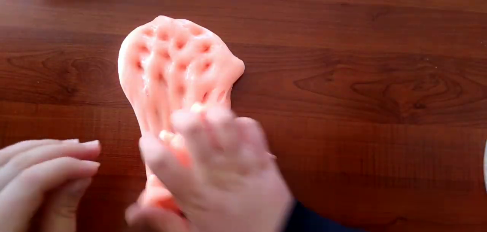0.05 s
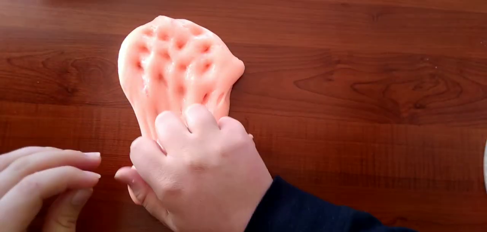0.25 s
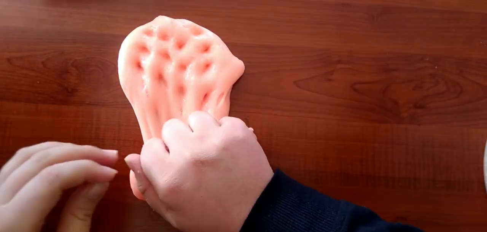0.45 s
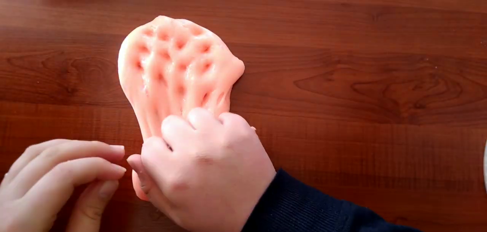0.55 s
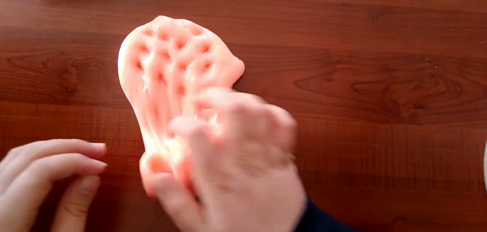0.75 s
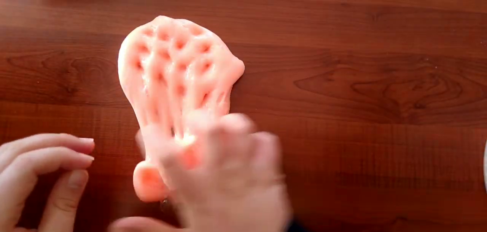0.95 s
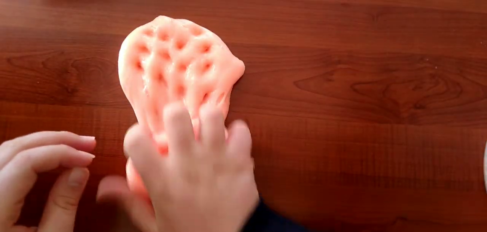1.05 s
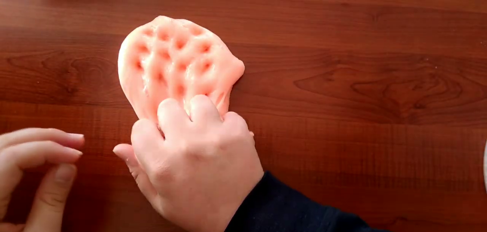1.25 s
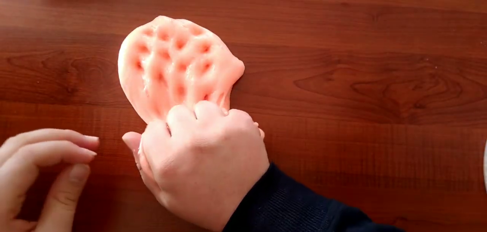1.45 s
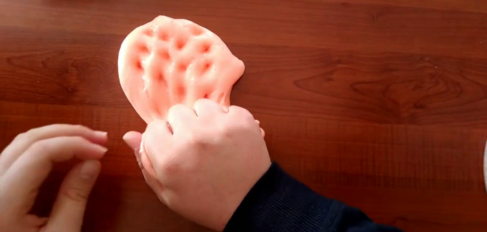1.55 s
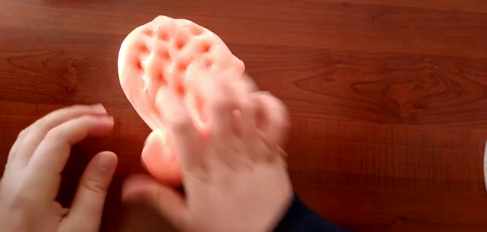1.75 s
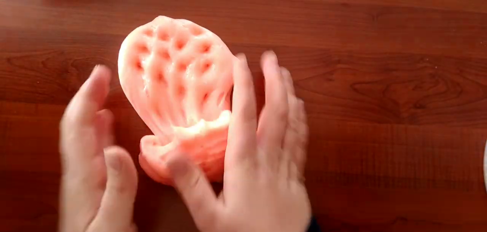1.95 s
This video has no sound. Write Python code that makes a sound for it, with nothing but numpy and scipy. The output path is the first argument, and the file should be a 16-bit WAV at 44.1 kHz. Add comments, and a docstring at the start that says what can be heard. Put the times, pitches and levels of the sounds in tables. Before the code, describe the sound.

Close slime pops and brief wet squelches, with soft hand thuds in a quiet small room

```python
"""A small room, a wooden table, a stereo microphone close by: a hand kneads slime over dull, quiet room noise.
First the hand bumps the table, a squeeze squelches as a swarm of minute bubbles, and tiny bubbles tick.
Then trapped air pockets burst as sharp pulses, and the slime hollow under the hand rings after each.
Small blasts overload the left channel, which swings back slowly through zero.
Throughout, a gate turns the treble down wherever it is faint."""
import sys
import numpy as np
from scipy import signal
from scipy.fft import rfft, irfft
from scipy.io import wavfile
from scipy.ndimage import uniform_filter1d

SR = 44100
rng = np.random.default_rng(int(sys.argv[2]) if len(sys.argv) > 2 else 0)


def generate_wav(signal):
    """Clip the signal to [-1, 1] and save it as 16-bit WAV at the path in sys.argv[1]."""
    frames = np.transpose(np.atleast_2d(signal))
    scaled = np.clip(frames, -1, 1) * 32767
    pcm = np.round(scaled).astype(np.int16)
    wavfile.write(sys.argv[1], SR, pcm)


N = 88200
SIZE = 2 ** 17  # transform length in samples, with space for the tails
HZ = np.fft.rfftfreq(SIZE, 1 / SR)
T = np.arange(N) / SR


def amp(db):
    """Decibels to gain."""
    return 10 ** (np.asarray(db) / 20)


def unit(x):
    """Scaled to rms 1."""
    return x / np.sqrt(np.mean(x ** 2))


def along(points, hz=HZ):
    """Read a curve of (frequency, value) points on a log frequency axis."""
    point_hz, value = np.transpose(points)
    return np.interp(np.log(hz + 1), np.log(point_hz), value)


def filtered(x, response):
    """Sound x passed through a frequency response."""
    return irfft(rfft(x, SIZE) * response, SIZE)[..., :N]


def causal(db):
    """Minimum-phase response: the most compact causal one with this colour in dB."""
    cepstrum = irfft(np.log(amp(db)))
    cepstrum[1:SIZE // 2] *= 2
    cepstrum[SIZE // 2 + 1:] = 0
    return np.exp(rfft(cepstrum))


def resonance(hz, q):
    """One damped mode of peak gain 1."""
    damping = 1j * HZ * hz / q
    return damping / (hz ** 2 - HZ ** 2 + damping)


def pulse(s):
    """Spectrum of a pressure pulse at time s."""
    return np.exp(-2j * np.pi * HZ * s)


def noise(alike, db=0):
    """Coloured stereo noise of rms 1; the mid/side balance sets how alike left and right are."""
    turn = np.arccos(np.clip(along(alike), -1, 1)) / 2
    balance = np.array([np.cos(turn), np.sin(turn)])
    mid, side = filtered(rng.standard_normal((2, N)), amp(db) * balance)
    return unit(np.array([mid + side, mid - side]))


# colour of the room noise: hz, relative_level_db
BACKGROUND_COLOUR = [(20, 5), (50, 4), (100, -8.5), (180, -8), (300, -17), (500, -17.5), (1000, -22.5),
                     (2400, -25.5), (2800, -35.5), (3300, -35.5), (6000, -34.5), (15000, -41.5)]
# its rms level over time: time_s, level_db (re full scale)
BACKGROUND_LEVEL = [(0, -59), (.05, -75), (.13, -57.5), (.8, -53.5), (1.1, -57), (1.5, -57), (1.6, -59.5),
                    (1.75, -52), (2, -56.5)]
# how alike it is at the two microphone channels: hz, left_right_likeness
BACKGROUND_ALIKE = [(30, 1), (300, 0.87), (1500, .6), (4000, .2), (12000, .1)]


def room_noise():
    """Dull background noise of the room, its level dipping sharply near the start, then wandering."""
    level_db = np.interp(T, *np.transpose(BACKGROUND_LEVEL))
    return amp(level_db) * noise(BACKGROUND_ALIKE, along(BACKGROUND_COLOUR))


# colour of the direct sound: hz, level_db
DIRECT_COLOUR = [(1500, 0.5), (2500, -3), (5000, 3), (10000, -12)]
# colour of the scatter from hand and table: hz, level_db
SCATTER_COLOUR = [(200, -17), (600, -1.5), (1200, -5.5), (2500, -7.5), (8000, 2)]
# its stereo likeness, held within -1 to 1: hz, left_right_likeness
SCATTER_LIKENESS = [(200, -2.4), (1000, -0.72), (2200, -1), (4000, 0.61)]
SCATTER_DELAY_S, SCATTER_T60_S = 0.0004, 0.023
RIGHT_LAG_S = 0.00005  # the direct sound reaches the left channel first


def near_sound():
    """Direct sound, and the brief decaying scatter from hand and table close to the microphone."""
    arrivals = np.array([pulse(0), pulse(RIGHT_LAG_S)])
    direct = filtered(T == 0, causal(along(DIRECT_COLOUR)) * arrivals)
    scatter = noise(SCATTER_LIKENESS) * amp(-60 * T / SCATTER_T60_S) * (T > SCATTER_DELAY_S)
    return direct + filtered(unit(scatter) / np.sqrt(N), causal(along(SCATTER_COLOUR)))


# time for the room to fall by 60 dB: hz, decay_s
ROOM_DECAY = [(100, .45), (400, 0.33), (2000, 0.36), (5000, 0.35), (12000, 0.24)]
# colour of the room's tail: hz, level_db
ROOM_COLOUR = [(80, -12.5), (300, -9.5), (1000, -8.5), (2200, -11), (4200, 2.5), (8000, -3.5),
               (13000, -1.5)]
# its stereo likeness: hz, left_right_likeness
ROOM_LIKENESS = [(100, .9), (400, 0.86), (1200, 0.064), (4000, 0)]
ROOM_BUILD_S = 0.015


def room_tail():
    """Reverberation as noise that builds up, then decays at its own rate in each band."""
    hz, t, bands = signal.stft(noise(ROOM_LIKENESS), SR, nperseg=256)
    decay = amp(-60 * t / along(ROOM_DECAY, hz)[:, None])
    tail = signal.istft(bands * decay, SR, nperseg=256)[1][:, :N]
    tail = unit(tail * (1 - np.exp(-T / ROOM_BUILD_S))) / np.sqrt(N)
    return filtered(tail, amp(along(ROOM_COLOUR)))


# echoes off a near surface and a wall: delay_s, level_db
REFLECTIONS = [(.0023, -15.5), (.0098, -17.5)]


def paths():
    """From one spot on the table to the microphone: near sound, its echoes and the room's tail."""
    echoes = sum(amp(db) * pulse(s) for s, db in REFLECTIONS)
    return filtered(near_sound(), 1 + echoes) + room_tail()


def heard(spectrum):
    """A sound on the table as it reaches the microphone, with freshly drawn scatter and tail."""
    return filtered(paths(), spectrum)


# soft bumps of the hand on the table: start_s, relative_level_db, pitch_hz, dull_above_hz
HAND_BUMPS = [(0.0614, 1, 220, 1300), (.897, -9, 194.4, 300), (1.042, 5, 81, 191), (1.105, -3.5, 123, 218)]
BUMP_Q, SLAP_DB = 1.3, -14


def bumps():
    """The hand meets the table through the slime: the softer the contact, the duller the thud."""
    spectrum = 0
    for start, db, hz, dull_hz in HAND_BUMPS:
        contact = causal(db - 10 * np.log10(1 + (HZ / dull_hz) ** 8))
        thud = resonance(hz, BUMP_Q)
        slap = amp(SLAP_DB) * resonance(4 * hz, 1)
        spectrum = spectrum + pulse(start) * contact * (thud + slap)
    return heard(spectrum)


# squeezes of the slime: start_s, end_s, level_db (rms re full scale while held), dull_above_hz
SLIME_SQUEEZES = [(0.083, 0.12, -57, 1000), (0.664, 0.734, -51.5, 13200), (1.699, 1.748, -48, 6020),
                  (1.765, 1.79, -55.5, 10000)]
# colour of the squelch: hz, relative_level_db
SQUELCH_COLOUR = [(80, -11.5), (230, -6), (400, 4), (700, -4.5), (1300, -3), (2300, -1), (3300, -15),
                  (5000, -19.5), (7500, -11.5), (11000, -31.5), (16000, -42)]
SQUEEZE_RISE_S, SQUEEZE_FALL_S = 0.02007, 0.012
BUBBLES_PER_S, BUBBLE_SPREAD_DB = 550, 4.5
HISS_DB = -4.5  # relative to the swarm


def squelch():
    """Each squeeze crushes a swarm of minute bubbles over a wet hiss; it swells, holds and stops."""
    out = np.zeros((2, N))
    for start, end, db, dull_hz in SLIME_SQUEEZES:
        rise = np.minimum(T - start, 0) / SQUEEZE_RISE_S
        fall = np.maximum(T - end, 0) / SQUEEZE_FALL_S
        swell = amp(db) * np.exp(rise - fall)
        bursts = rng.random(N) < BUBBLES_PER_S / SR
        swarm = bursts * amp(BUBBLE_SPREAD_DB * rng.standard_normal(N))
        swarm_heard = unit(heard(rfft(swarm - swarm.mean(), SIZE)))
        wet = swarm_heard + amp(HISS_DB) * noise(ROOM_LIKENESS)
        colour = amp(along(SQUELCH_COLOUR)) / np.sqrt(1 + (HZ / dull_hz) ** 4)
        out += swell * unit(filtered(wet, colour))
    return out


# tiny bubbles: start_s, relative_level_db, pitch_hz, crack_db (relative to the ring)
TINY_BUBBLES = [(0.1174, -14, 1920, -28.5), (.1344, -19.5, 2000, -17), (.2851, 3, 740, -29),
                (0.331, -20.5, 6460, -30.5), (0.4719, 0.5, 1820, -14), (.8662, -16.5, 900, -42),
                (1.1732, -21, 1683, -24.5), (1.1854, -17, 2250, -36), (1.218, -34.5, 1900, -2.5),
                (1.4343, -20, 1700, -12), (1.4855, -16.5, 1692, -29), (1.7056, -6.5, 497, -38),
                (1.8348, -2.5, 953, -37), (1.8824, -20, 2420, -50)]
TICK_Q, CRACK_DULL_HZ = 2.6, 7500


def ticks():
    """A tiny bubble cracks open and its cavity rings for a few cycles."""
    crack = causal(-20 * np.log10(1 + (HZ / CRACK_DULL_HZ) ** 4))
    spectrum = 0
    for start, db, hz, crack_db in TINY_BUBBLES:
        ring = resonance(hz, TICK_Q) ** 2
        spectrum = spectrum + pulse(start) * amp(db) * (ring + amp(crack_db) * crack)
    return heard(spectrum)


# bursting air pockets: start_s, relative_level_db, thump_db, bite_db, snap_db, fizz_db, left_over_right_db
AIR_POCKETS = [(0.2339, 21.5, 0, -1.5, -9.5, -27, -0.5), (0.4022, -8, -1.5, 10, 3.5, 16, 2),
               (0.4424, 18.5, -2.5, 0.5, -0.5, 3, -3.5), (.5055, -3.5, 0, 5, 1.5, 31.5, -1),
               (1.2329, 4.5, 5.5, 8.5, 11, -4, 0), (1.3376, -4, -9.5, -6.5, -7.5, 2, 0.5),
               (1.3468, 6, 3.5, -2, -5, -14.5, -0.5), (1.7423, -6.5, -1.5, 7, -2.5, -2.5, 2.5)]
# colour shared by all pops: hz, relative_level_db
SHARED_POP_COLOUR = [(30, -27.5), (100, -11), (180, -4.5), (330, 0), (520, -3), (800, -3), (1180, -4),
                     (1500, -4), (2100, -2.5), (2450, -4), (2750, -11.5), (3200, -20.5), (3900, -18.5),
                     (4900, -17.5), (6000, -22), (7300, -21), (9500, -35.5), (12500, -39.5), (14000, -55.5),
                     (16000, -55.5)]
# the slime hollow under the hand: pitch_hz, q, level_db
HOLLOW_MODES = [(340, 7.4, -7), (1164, 9.8, -5), (2060, 19, -5)]
# where each pop's own tone is set; the middle stays at 0 dB
THUMP_HZ, MID_HZ, BITE_HZ, SNAP_HZ, FIZZ_HZ = 340, 1000, 2200, 4300, 10000


def pops():
    """Each air pocket bursts in one pulse: big ones thump, thin-walled ones snap and fizz; the hollow rings."""
    out = np.zeros((2, N))
    ring = 1 + sum(amp(db) * resonance(hz, q) for hz, q, db in HOLLOW_MODES)
    for start, db, thump, bite, snap, fizz, pan in AIR_POCKETS:
        tone = along([(THUMP_HZ, thump), (MID_HZ, 0), (BITE_HZ, bite), (SNAP_HZ, snap), (FIZZ_HZ, fizz)])
        burst = causal(db + along(SHARED_POP_COLOUR) + tone)
        out += heard(pulse(start) * ring * burst) * amp([[pan / 2], [-pan / 2]])
    return out


# small blasts on the left channel: start_s, offset (re full scale), recovery_s (until it crosses zero)
LEFT_BLASTS = [(.4427, 0.86, 0.048), (.5055, 0.54, 0.043), (1.2343, -0.027, 0.13)]
OVERLOAD_RISE_S = 0.0002


def overload():
    """The left channel jumps to an offset, then drifts back through zero; each jump starts the drift anew."""
    left = np.zeros(N)
    for start, offset, recovery in LEFT_BLASTS:
        t = np.maximum(T - start, 0)
        jump = 1 - np.exp(-(t / OVERLOAD_RISE_S) ** 2)
        drift = offset * (1 - t / recovery) * np.exp(-t / recovery)
        left += jump * (drift - left)  # the new drift replaces the old one
    return np.array([left, np.zeros(N)])


def scene():
    """Everything at the microphone, with the left channel's overload."""
    return room_noise() + bumps() + squelch() + ticks() + pops() + overload()


GATE_HZ, GATE_WINDOW_S = 2850, 0.002
GATE_DB, SHUT_DB = -61, -18  # threshold in rms re full scale, and treble gain when fully shut
TOP_HZ = 16200  # band limit


def record(dry):
    """A gate turns the treble down when it is faint; nothing is kept above the band limit."""
    treble = filtered(dry, 1 - 1 / (1 + (HZ / GATE_HZ) ** 20))
    power = uniform_filter1d(np.mean(treble ** 2, axis=0), int(GATE_WINDOW_S * SR))
    power = np.abs(power)  # rounding can leave tiny negatives
    shut = 1 / (1 + (power / amp(GATE_DB) ** 2) ** 2)
    removed = treble * shut * (1 - amp(SHUT_DB))
    return filtered(dry - removed, HZ < TOP_HZ)


dry = scene()
out = record(dry)
generate_wav(out)
```